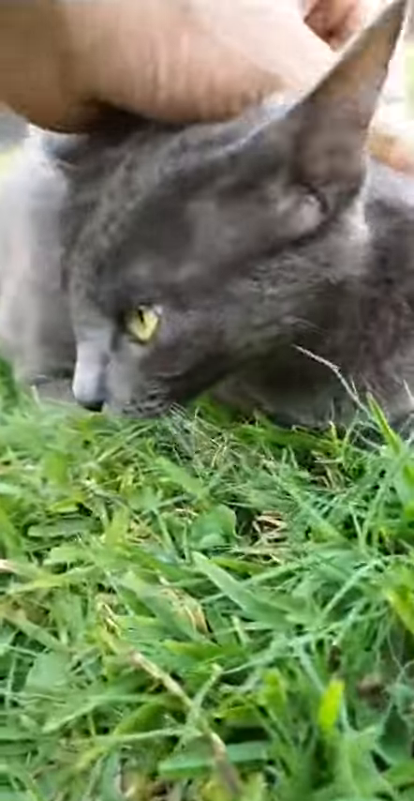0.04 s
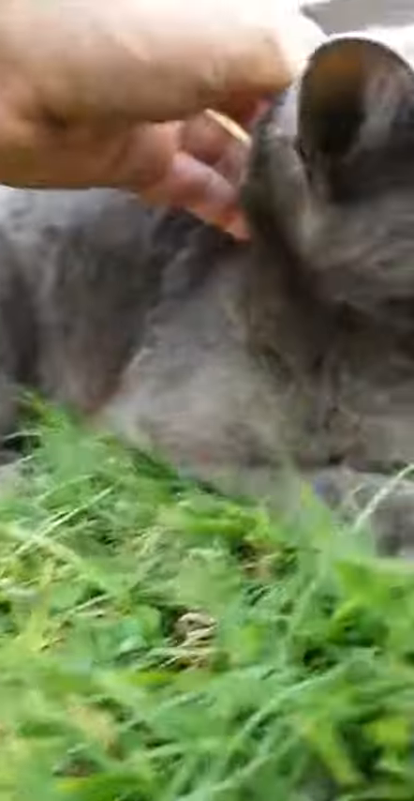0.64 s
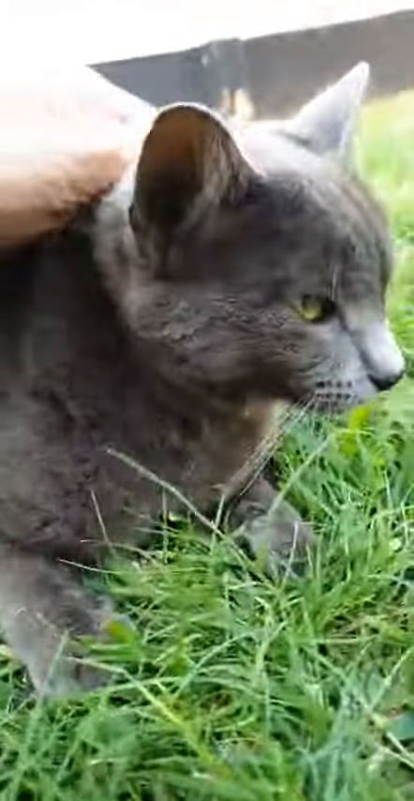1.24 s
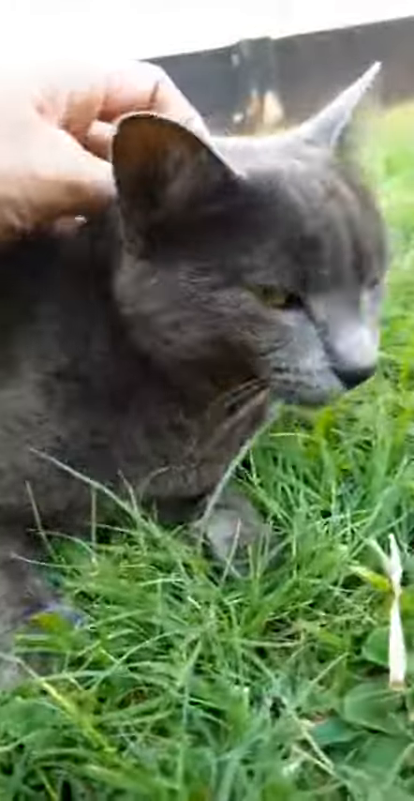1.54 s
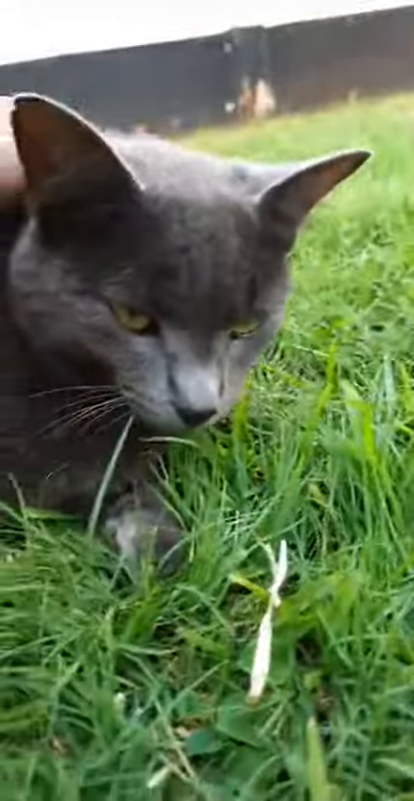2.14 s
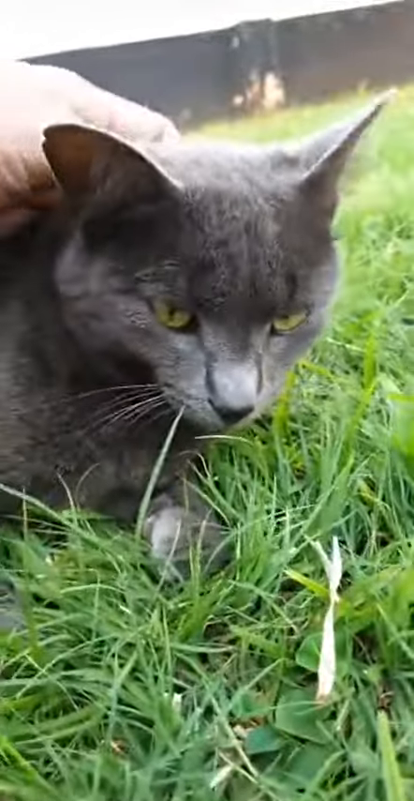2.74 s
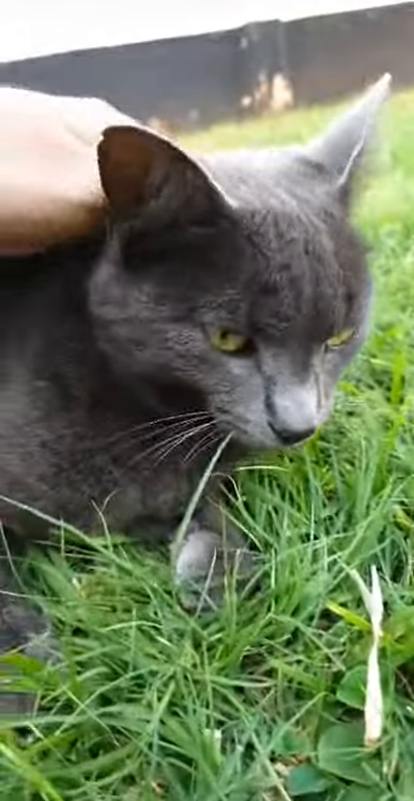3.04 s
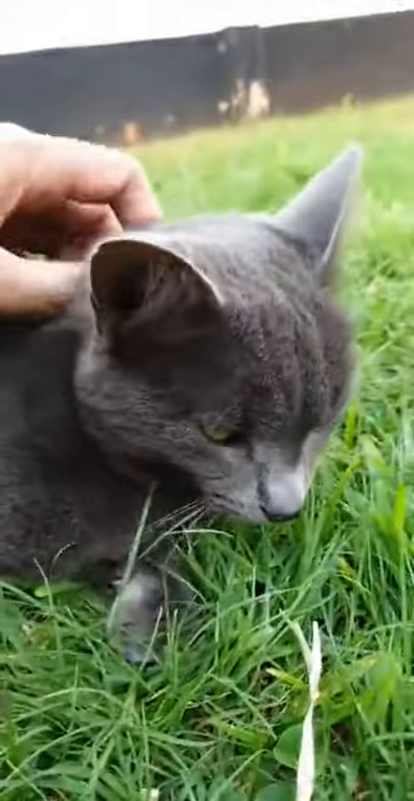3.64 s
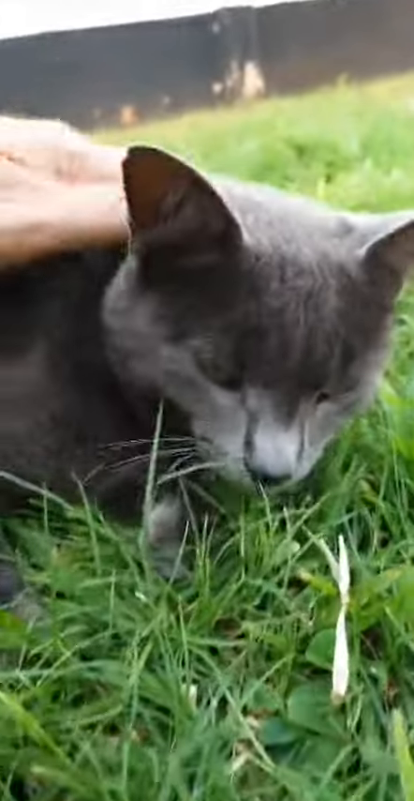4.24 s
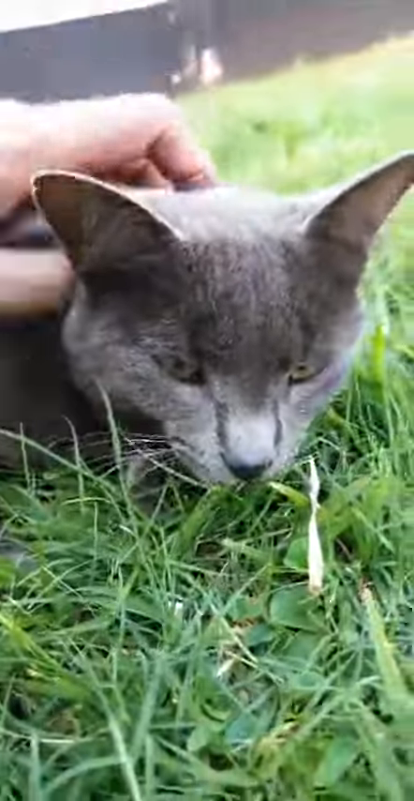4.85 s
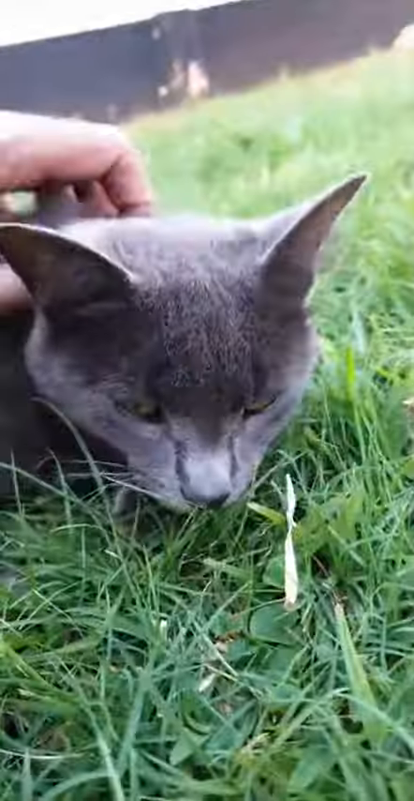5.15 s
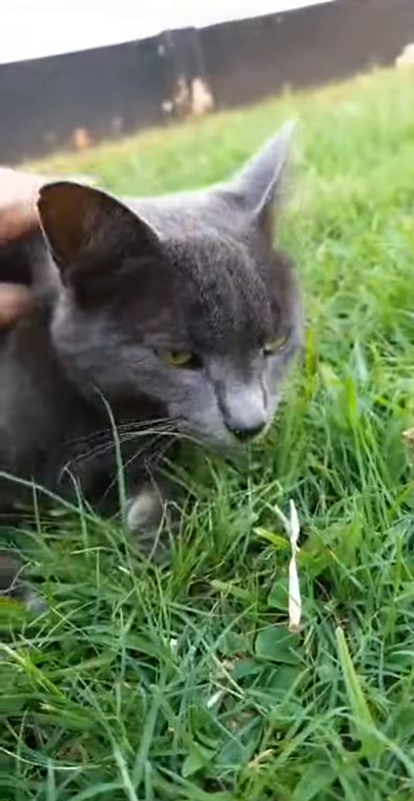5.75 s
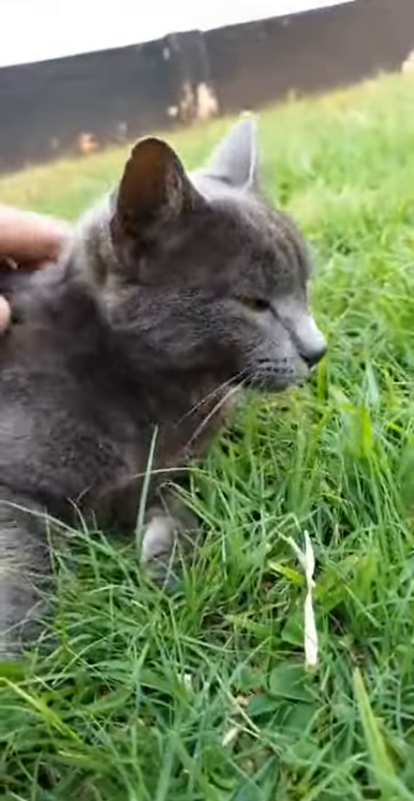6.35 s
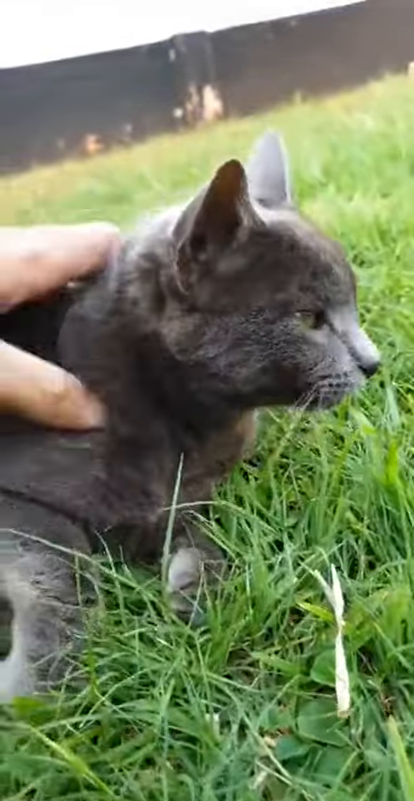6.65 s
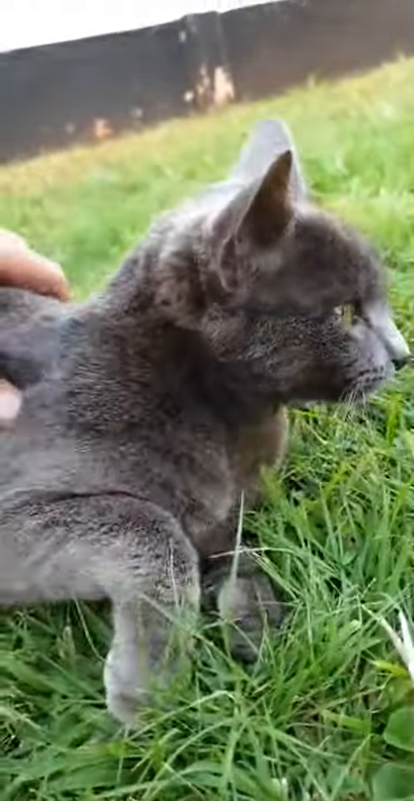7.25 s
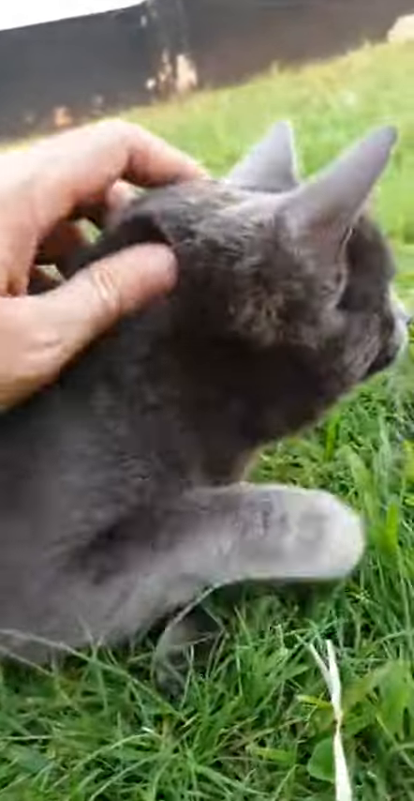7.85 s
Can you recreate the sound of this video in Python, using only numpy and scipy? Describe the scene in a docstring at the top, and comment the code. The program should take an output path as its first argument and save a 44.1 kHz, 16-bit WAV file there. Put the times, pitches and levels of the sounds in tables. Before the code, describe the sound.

Close, hissy rustling of grass and a hand on the microphone comes in uneven strokes, with dull bumps and a single hard click. After a short lull, a rougher spell of scraping follows, full of crisp snaps from grass blades. It ends quietly with fingers barely grazing a cat's fur. Behind it all are a steady far-off motor hum, a low outdoor rumble and a few faint bird hoots and whistles.

```python
"""Grass and the holding hand rustle against a camera while a cat is stroked on a lawn.
Tiny friction slips make a grainy hiss and, under firm contact, a coarse body, with scrapes and scuffs.
Blades tick on the case, the grip bumps it softly and one sharp knock rings it.
Some way off a motor hums at multiples of its shaft rate; birds call faintly in the open air."""
import sys
import numpy as np
from scipy import signal
from scipy.fft import rfft, irfft, next_fast_len
from scipy.io import wavfile
from scipy.ndimage import uniform_filter1d, map_coordinates

SR = 44100
rng = np.random.default_rng(int(sys.argv[2]) if len(sys.argv) > 2 else 0)


def wav_record(signal):
    """Record a signal, one row per channel, as 16-bit PCM in the file named by sys.argv[1]."""
    frames = np.transpose(np.atleast_2d(signal))
    bounded = np.clip(frames, -1, 1)
    # unit amplitude maps onto the largest positive 16-bit level
    quanta = np.round(bounded * 32767).astype(np.int16)
    wavfile.write(sys.argv[1], SR, quanta)


N = 352359

# freq_hz, gain_db
HISS_SPECTRUM = [(590, -32), (1000, -3.5), (1190, -14), (1530, -11.5), (2470, -12.5), (2740, -5),
                 (3870, -6), (4490, 0), (5210, -1), (6260, 1), (8840, -8.5), (10600, 1), (12600, 3.5),
                 (14100, 0), (15500, -31.5)]
# freq_hz, gain_db
BODY_SPECTRUM = [(60, -26), (150, 2.5), (300, 3), (600, 3.5), (1000, 1), (1600, -0.5), (2200, -2),
                 (3200, -3), (4200, -4), (5500, -4), (7000, -11), (8500, -16.5), (12000, -22),
                 (15000, -34.5)]
def rustle():
    """Friction on the case: light contact hisses, firm contact adds a coarse body."""
    hiss_gain, body_gain = np.sqrt(strokes() * grip() ** 2 + scrapes() + grazes())
    hiss = coloured(friction(slips_per_s=13000, spread_db=4, clump_db=0.4, clump_hz=300), HISS_SPECTRUM)
    body = coloured(friction(slips_per_s=8000, spread_db=2.5, clump_db=1.87, clump_hz=330), BODY_SPECTRUM)
    return hiss_gain * wander(hiss, depth_db=1.5) + body_gain * wander(body, depth_db=2.0)


def friction(slips_per_s, spread_db, clump_db, clump_hz):
    """Tiny slips of uneven size, in clumps."""
    slips = rng.random(N) < slips_per_s / SR
    sizes = rng.choice([-1, 1], N) * amp(spread_db * np.clip(rng.standard_normal(N), -2, 2))
    clumps = amp(clump_db * np.clip(wobble(clump_hz), -2, 2))
    return unit(slips * sizes * clumps)


def grip():
    """Contact gain: fibres catch and let go under an unsteady hand."""
    catches_per_s, decay_s = 45, 0.0012
    catches = (rng.random(N) < catches_per_s / SR) * rng.uniform(0.27, 1.3, N)
    bursts = signal.lfilter([1], [1, -np.exp(-1 / (decay_s * SR))], catches)
    flutter = amp(1.5 * wobble(110))
    unsteady_hand = amp(0.92 * wobble(22))
    return (1 + bursts) * flutter * unsteady_hand


def wander(x, depth_db):
    """The contact point wanders, shifting the colour."""
    spectra = signal.stft(x, nperseg=512)[2]
    patches = uniform_filter1d(rng.standard_normal(spectra.shape), size=6, axis=0)
    patches = unit(uniform_filter1d(patches, size=7, axis=1))
    return unit(signal.istft(spectra * amp(depth_db * patches), nperseg=512)[1][:N])


# start_s, hold_s, release_s, hiss_db, body_over_hiss_db
DRAG_STROKES = [(0.009, .04, 0.44, -54.5, -3.5), (0.283, 0.018, 0.13, -61, 0.5),
                (0.434, 0.16, 0.52, -54.5, -5), (0.578, 0.05, 0.062, -47, -1.5),
                (0.73, 0.61, 0.061, -50, -5.5), (1.174, 0.032, 0.29, -53, 3.5), (1.372, 0.16, .1, -54, -8),
                (1.548, 0.059, 0.087, -48.5, 5), (1.65, 0.2, 0.19, -50, -2.5),
                (2.026, 0.089, 0.51, -50, -0.5), (2.698, 0.25, 0.27, -61.5, -11),
                (3.198, 0.21, 0.17, -73.5, -11), (4.231, 0.022, 0.2, -46, 5.5),
                (4.307, .015, 0.32, -48.5, -0.5), (4.388, .07, 0.075, -59.5, 7.5),
                (4.667, 0.14, .4, -49.5, 5.5), (4.942, .025, 0.34, -51, 10),
                (5.206, 0.038, 0.21, -57.5, 10.5), (5.519, .055, 0.24, -53.5, 10.5),
                (5.676, 0.31, 0.36, -60, 1.5), (5.968, 0.25, .1, -65, 10.5),
                (6.333, 0.098, 0.063, -57.5, 13.5)]
def strokes():
    """Hiss and body power of grass and hand dragging over the case."""
    attack_s, ramp_db = 0.074, 18  # dB per attack or release time; the attack ends at start_s
    t, power = clock(), np.zeros((2, N))
    for start_s, hold_s, release_s, hiss_db, body_over_hiss_db in DRAG_STROKES:
        before = np.maximum(start_s - t, 0) / attack_s
        after = np.maximum(t - start_s - hold_s, 0) / release_s
        envelope = amp(-ramp_db * np.minimum(before + after, 10))
        power += contact_power(envelope, hiss_db, body_over_hiss_db)
    return power


# peak_s, hiss_db, rise_s, fall_s, body_over_hiss_db
SCRAPE_SLIPS = [(0.647, -36, 0.0011, 0.0039, -2), (0.808, -34, 0.0035, 0.0042, 0),
                (1.602, -35.5, .001, 0.0047, -2), (1.615, -33, 0.0037, .0046, 0.5),
                (1.632, -30.5, .005, 0.0027, -3.5), (2.004, -44.5, 0.00064, 0.0023, 6.5),
                (2.182, -48, .001, .0017, 4), (2.425, -44, .001, 0.0041, -4),
                (4.205, -40, .0007, .0045, -6), (4.92, -38, .0008, 0.0021, 5),
                (4.975, -39, 0.0072, 0.012, 1), (5.201, -36.5, 0.0017, 0.0035, 5.5),
                (5.213, -42, 0.0014, 0.0027, 10), (5.286, -44.5, 0.0053, 0.0056, 4.5),
                (5.511, -47.5, 0.0011, .0016, 14), (5.555, -38, 0.0038, 0.005, 1),
                (5.567, -26.5, 0.0021, .0026, 1.5), (5.589, -36, .0012, 0.0084, 2.5),
                (5.952, -45, 0.00092, .004, -8), (6.234, -56, 0.0011, 0.0052, 14),
                (6.281, -56.5, .0007, 0.011, 13), (6.327, -38, 0.0021, .0018, 4.5),
                (6.405, -45.5, .005, 0.004, 10), (6.434, -50.5, .006, 0.0082, 10)]
def scrapes():
    """Hiss and body power of slips that swell and break off."""
    return sum(contact_power(swell(peak_s, rise_s, fall_s), hiss_db, body_over_hiss_db)
               for peak_s, hiss_db, rise_s, fall_s, body_over_hiss_db in SCRAPE_SLIPS)


# peak_s, hiss_db, half_length_s
FUR_GRAZES = [(0.585, -42, .005), (0.996, -47.5, 0.016), (1.803, -46, .012), (1.892, -43.5, 0.007),
              (2.881, -56, 0.0091), (3.364, -62.5, 0.01), (3.637, -67, .009), (3.93, -78.5, 0.023),
              (7.1, -77.5, 0.03), (7.317, -74.5, .03), (7.595, -74.5, 0.035), (7.92, -69, .04)]
def grazes():
    """Hiss and body power of fingers grazing through fur."""
    return sum(contact_power(swell(peak_s, half_s, half_s), hiss_db, body_over_hiss_db=-10.5)
               for peak_s, hiss_db, half_s in FUR_GRAZES)


# peak_s, level_db, half_length_s, pitch_hz
HOLLOW_SCUFFS = [(0.306, -63, .021, 1720), (0.733, -42, 0.0018, 450), (1.203, -41, 0.007, 4700),
                 (2.005, -40, 0.0026, 800), (2.058, -53, 0.081, 660), (4.381, -42.5, 0.01, 1030),
                 (4.706, -38.5, 0.0093, 5500), (4.778, -50, .057, 1390), (5.353, -46.5, 0.0017, 1900),
                 (5.563, -29, 0.0018, 1260), (5.579, -40.5, .02, 1770), (7.922, -70, 0.05, 5620)]
def scuffs():
    """Friction sounds a broad resonance between fingers and case."""
    relative_width = 0.49
    track, t = np.zeros(N), clock(SR // 2) - 0.25
    for peak_s, level_db, half_s, pitch_hz in HOLLOW_SCUFFS:
        edges_hz = [pitch_hz * (1 - relative_width / 2), pitch_hz * (1 + relative_width / 2)]
        resonance = signal.butter(2, edges_hz, "bandpass", fs=SR)
        band = unit(signal.lfilter(*resonance, rng.standard_normal(len(t))))
        add(track, peak_s + t[0], amp(level_db) * band * np.exp(-0.5 * (t / half_s) ** 2))
    return track


# start_s, level_db
BLADE_TICKS = [(0.7292, -31), (0.8034, -23), (4.6199, -26), (4.6583, -20), (4.6788, -20), (4.6992, -21),
               (4.7326, -17), (4.7586, -13.5), (4.7744, -14.5), (4.8104, -24), (4.9596, -22), (5.531, -18),
               (6.063, -25.5), (6.3255, -22), (6.353, -16.5), (6.4054, -23)]
def ticks():
    """Blades snap free and flick the case: spike plus splutter, coloured by the microphone port."""
    delay_s, t60_s = 0.00074, 0.0072
    port_hz_db = [(200, -12), (1500, 1.5), (3000, 0.5), (5500, 7), (8500, -8),
                  (12000, -1.5), (14000, -5), (15500, -11)]
    track, t = np.zeros(N), clock(512)
    for start_s, level_db in list(BLADE_TICKS) + crackle():
        crack = 0.39 * rng.standard_normal(len(t)) * amp(-60 * t / t60_s)
        crack[0] = 1
        add(track, start_s + delay_s, amp(level_db) * crack)
    return coloured(track, port_hz_db)


# start_s, end_s, flicks_per_s, level_db
CRACKLE_SPELLS = [(4.65, 5.05, 35, -29), (6.09, 6.47, 30, -32.5)]
def crackle():
    """Lesser blade flicks at random times, as rows of start_s, level_db."""
    flicks = []
    for start_s, end_s, flicks_per_s, level_db in CRACKLE_SPELLS:
        times_s = np.flatnonzero(rng.random(N) < flicks_per_s / SR) / SR
        flicks += [(time_s, level_db) for time_s in times_s if start_s < time_s < end_s]
    return flicks


# start_s, level_db, pitch_hz, t60_s
GRIP_BUMPS = [(0.646, -23.5, 72.6, 0.038), (0.729, -17.5, 199, 0.027), (0.737, -21.5, 98, 0.035),
              (0.789, -27, 120, 0.036), (0.812, -30, 49.7, 0.083), (0.980, -27.5, 89.5, 0.047),
              (1.319, -24.5, 63, 0.051), (1.623, -34, 180, 0.038), (1.750, -29.5, 165, 0.031),
              (5.199, -25.5, 160, 0.028)]
def bumps():
    """Soft pushes of the grip on the case die within a few cycles."""
    attack_s, boost_db = 0.0015, 4.5
    track, t = np.zeros(N), clock(8192)
    for start_s, level_db, pitch_hz, t60_s in GRIP_BUMPS:
        envelope = amp(level_db + boost_db - 60 * t / t60_s) * (1 - np.exp(-t / attack_s))
        add(track, start_s, envelope * np.sin(2 * np.pi * pitch_hz * t))
    return track


# pitch_hz, level_db, t60_s
CASE_MODES = [(308, -1, 0.0021), (1660, -10.5, 0.004), (2907, -21.5, .004), (4100, -13, 0.0059),
              (5300, -6, .005), (6960, -16, .004), (11300, -16.5, 0.0072), (11800, -18, 0.011),
              (12030, -14.5, .014), (13090, -17.5, .011)]
# delay_s, level_db
KNOCK_CONTACTS = [(0, -11), (.00073, -2.5)]
def knock():
    """Two quick hard contacts ring the case, each with a bright crack."""
    start_s, crack_t60_s = 1.3188, 0.004
    track, t = np.zeros(N), clock(2048)
    ring = sum(amp(level_db - 60 * t / t60_s) * np.sin(2 * np.pi * pitch_hz * t)
               for pitch_hz, level_db, t60_s in CASE_MODES)
    for delay_s, level_db in KNOCK_CONTACTS:
        crack = amp(-15 - 60 * t / crack_t60_s) * np.diff(rng.standard_normal(len(t) + 1))
        add(track, start_s + delay_s, amp(level_db) * (ring + crack))
    return track


# time_s, speed_hz
SHAFT_SPEED = [(0, 25.1), (3.5, 25.17), (5.5, 25.08), (6.9, 24.97), (7.99, 25.1)]
# shaft_multiple, level_db
MOTOR_LINES = [(2, -61), (3, -46.5), (4, -56.5), (6, -61.5), (7, -65), (8, -63.5), (9, -66.5), (12, -71),
               (14, -79.5), (15, -67), (18, -73.5), (20, -81.5), (21, -72)]
# time_s, gain_db
MOTOR_SWELL = [(0, 1), (1.5, 0), (3, -1), (4.8, 2.5), (6.2, 0.5), (7.99, 0)]
def motor():
    """Distant hum: shaft harmonics waver on their way through the air, the higher ones more."""
    turns = np.cumsum(np.interp(clock(), *np.transpose(SHAFT_SPEED))) / SR
    hum = np.zeros(N)
    for multiple, level_db in MOTOR_LINES:
        waver = min(multiple / 4.5, 2.2)
        cycles = multiple * turns + rng.random() + 0.068 * waver * wobble(3)
        hum += amp(level_db + waver * wobble(3.3)) * np.sqrt(2) * np.sin(2 * np.pi * cycles)
    return hum * amp(np.interp(clock(), *np.transpose(MOTOR_SWELL)))


# start_s, length_s, start_hz, end_hz, level_db
BIRD_CALLS = [(3.55, 0.11, 913, 910, -68.5), (3.79, 0.163, 905, 890, -65), (6.539, 0.27, 6550, 7650, -71),
              (6.76, 0.22, 6660, 7100, -77), (6.989, 0.26, 5950, 6500, -78.5), (7.08, .18, 900, 890, -76),
              (7.32, 0.23, 5950, 6400, -78.5)]
def birds():
    """Far hoots and gliding whistles, blurred by garden echoes."""
    calls = np.zeros(N)
    for start_s, length_s, start_hz, end_hz, level_db in BIRD_CALLS:
        progress = clock(int(length_s * SR)) / length_s
        glide_hz = start_hz + (end_hz - start_hz) * np.sin(np.pi / 2 * progress)
        pitch_hz = glide_hz * (1 + 0.022 * wobble(450)[:len(progress)])
        envelope = amp(level_db) * np.sin(np.pi * progress)
        add(calls, start_s, envelope * np.sin(2 * np.pi * np.cumsum(pitch_hz) / SR))
    t, echo_t60_s = clock(SR // 2), 0.29
    tail = rng.standard_normal(len(t)) * amp(-60 * t / echo_t60_s)
    echoes = signal.fftconvolve(calls, tail / np.linalg.norm(tail))[:N]
    return calls + amp(-3) * echoes


# freq_hz, gain_db
AIR_SPECTRUM = [(15, -37.5), (25, -13.5), (53, -6), (86, -8), (126, -11), (198, -12.5), (274, -18.5),
                (450, -22.5), (826, -36), (1700, -42.5), (3900, -50), (4600, -46.5), (6300, -46),
                (8350, -61), (12800, -46.5), (14000, -50.5), (15500, -78.5)]
def open_air():
    """Low outdoor rumble and thin hiss."""
    return amp(-54 + 0.8 * wobble(1.7)) * unit(coloured(rng.standard_normal(N), AIR_SPECTRUM))


def contact_power(envelope, hiss_db, body_over_hiss_db):
    """Power of one contact in two rows: hiss, body."""
    return np.outer(amp([hiss_db, hiss_db + body_over_hiss_db]), envelope) ** 2


def swell(peak_s, rise_s, fall_s):
    """Bell-shaped rise and fall."""
    lag_s = clock() - peak_s
    width_s = np.where(lag_s < 0, rise_s, fall_s)
    return np.exp(-0.5 * np.minimum((lag_s / width_s) ** 2, 100))


def coloured(x, points_hz_db):
    """Minimum-phase filter through the given gain points."""
    size = 2 * next_fast_len(N // 2 + 8192)
    freq_hz, gain_db = np.transpose(points_hz_db)
    gain = amp(np.interp(np.log(np.fft.rfftfreq(size, 1 / SR) + 1), np.log(freq_hz), gain_db))
    cepstrum = irfft(np.log(gain))
    cepstrum[1:size // 2] *= 2
    cepstrum[size // 2 + 1:] = 0
    return irfft(rfft(x, size) * np.exp(rfft(cepstrum)))[:N]


def wobble(rate_hz):
    """Smooth random curve with knots at rate_hz."""
    return map_coordinates(rng.standard_normal(int(N * rate_hz / SR) + 4), [clock() * rate_hz])


def add(track, start_s, sound):
    """Mix a sound into the track."""
    part = track[max(round(start_s * SR), 0):][:len(sound)]
    part += sound[:len(part)]


def amp(db):
    """Decibels to gain."""
    return 10 ** (np.asarray(db) / 20)


def unit(x):
    """Scale to rms 1."""
    return x / np.sqrt(np.mean(x ** 2) + 1e-20)


def clock(count=N):
    """Sample times in seconds."""
    return np.arange(count) / SR


def scene():
    """Handling sounds in front, garden behind; mono."""
    garden = motor() + open_air() + birds()
    return (garden + rustle() + scuffs() + bumps() + knock() + ticks())[None]


def record(dry):
    """The camera rolls off both ends and cuts all above its band limit."""
    limit_hz = 15400
    freq_hz = np.fft.rfftfreq(N, 1 / SR)
    roll_off = amp(np.interp(freq_hz, [20, 45, 14000, 14600], [-7, -0.5, -0.5, -12]))
    return irfft(rfft(dry) * roll_off * (freq_hz < limit_hz), N)


dry = scene()
out = record(dry)
wav_record(out)
```